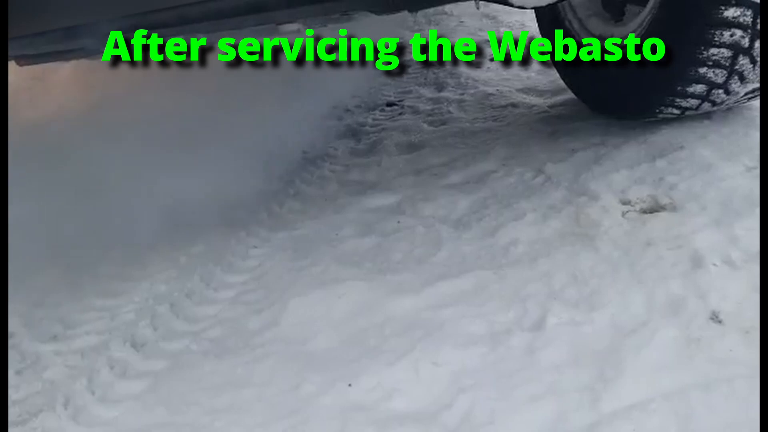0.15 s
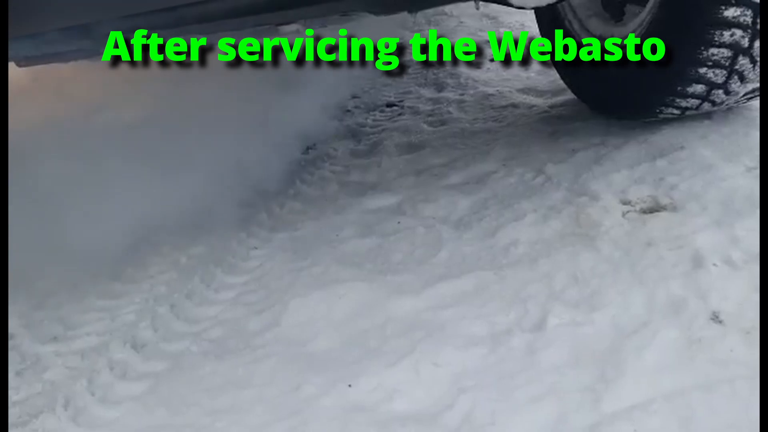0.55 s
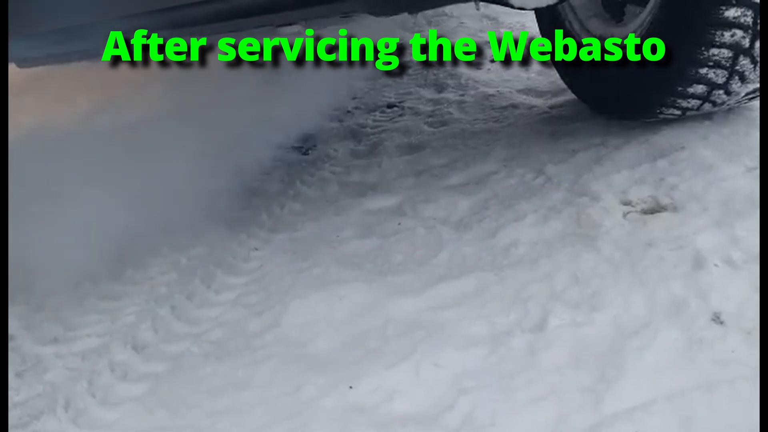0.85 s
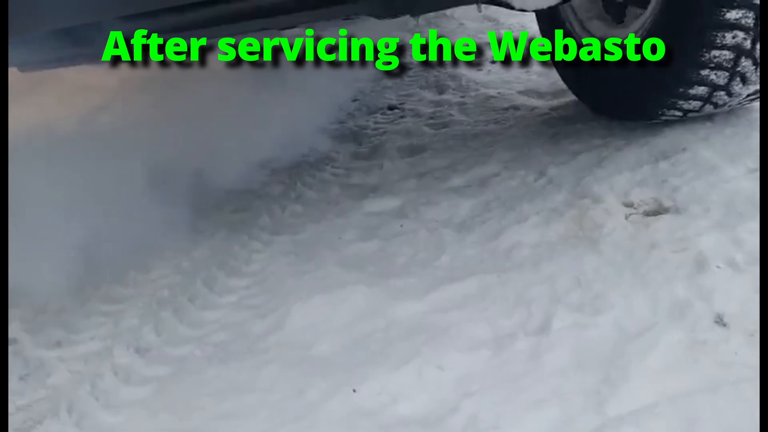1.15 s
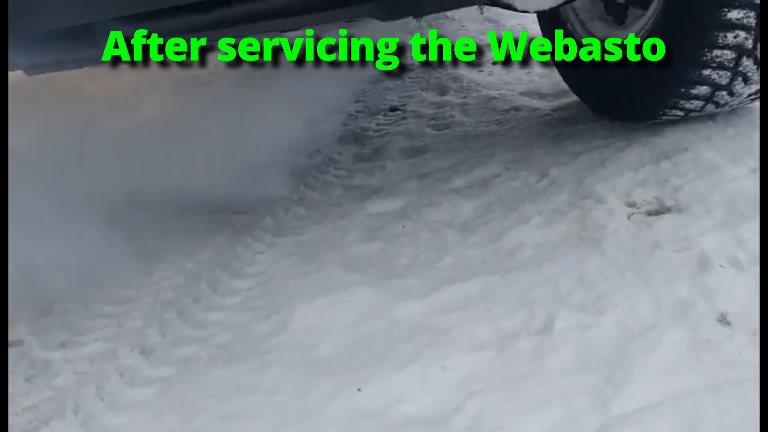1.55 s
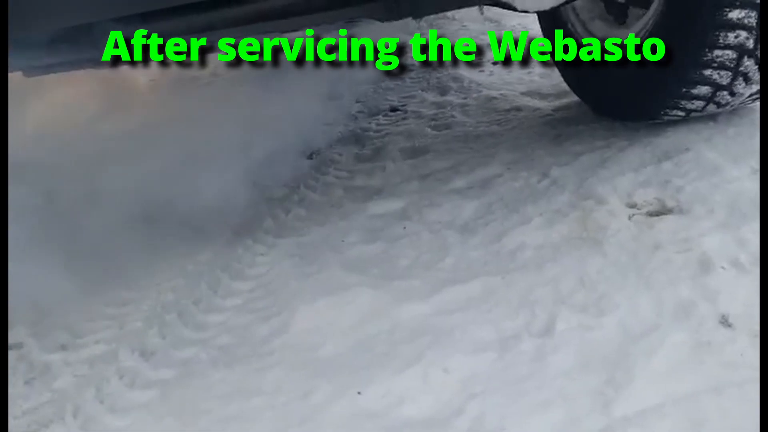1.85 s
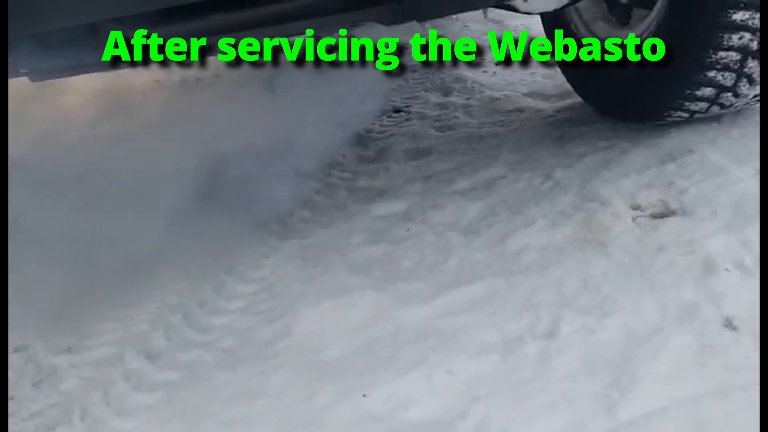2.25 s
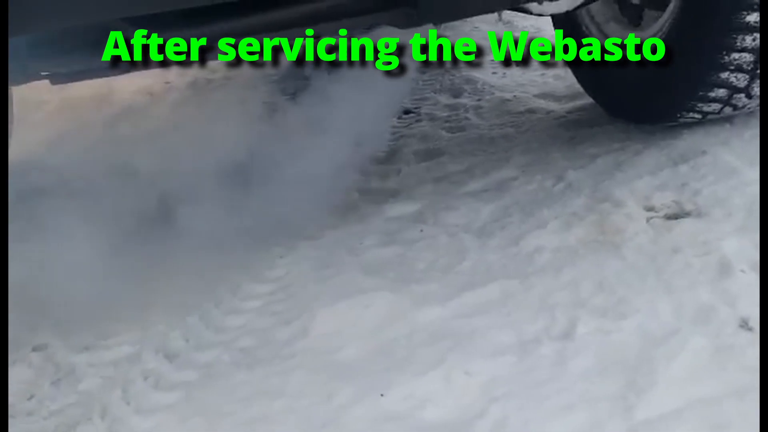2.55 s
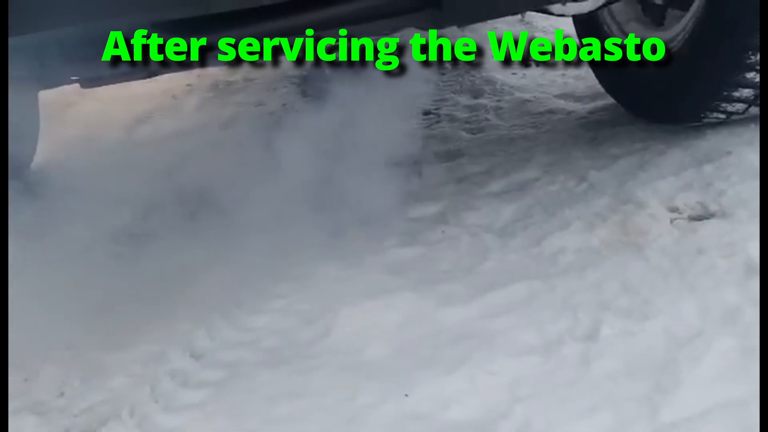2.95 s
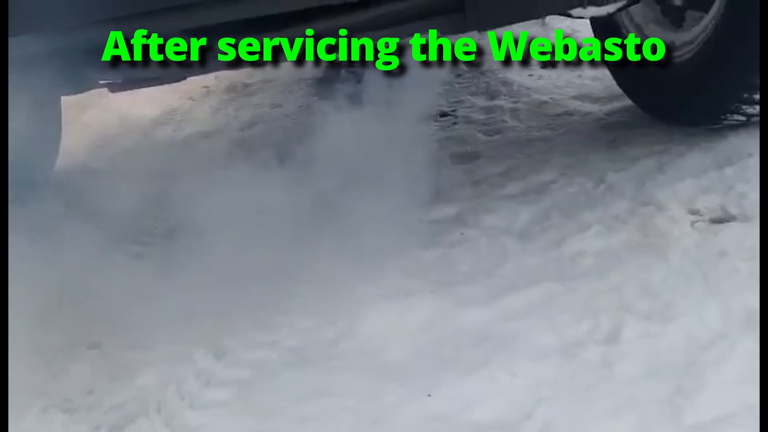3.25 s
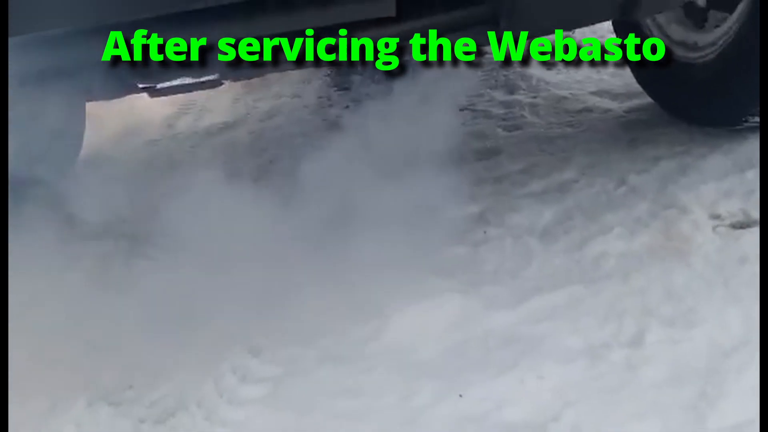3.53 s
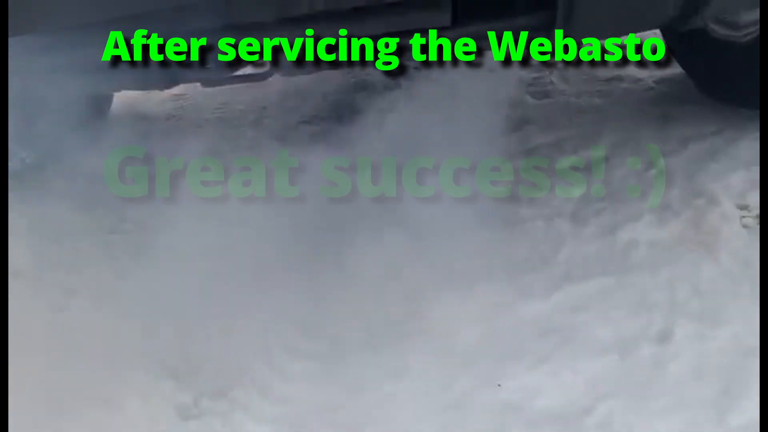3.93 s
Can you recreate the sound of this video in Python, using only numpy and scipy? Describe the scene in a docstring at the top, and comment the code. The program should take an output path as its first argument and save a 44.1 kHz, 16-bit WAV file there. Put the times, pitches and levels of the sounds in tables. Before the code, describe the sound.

Outdoor stereo close-up of a continuous mechanical drone: rapid exhaust pulses, uneven combustion knocks with a short metallic ring, a whirring blower and rough rushing gas. It is already running at the start and never stops. Late on, as the microphones shift, the ringing and exhaust sink while the roar and block knocks come forward.

```python
"""Outdoors on snow, close beside a parked vehicle, on two microphones a hand apart. From the start
a six-cylinder engine idles: firings ring two exhaust pipes, knocks ring the block and the burning gas.
A fuel heater's blower hums and ticks on its own speed, under the rush and rumble of flame and exhaust gas.
From about 2.5 s the microphones move along the vehicle: a hollow tone swells, treble echoes fade,
then gas ring and exhaust sink while the roar fills out, the block comes up and the hollow tones shift."""
import sys
import numpy as np
from scipy import signal
from scipy.fft import rfft, irfft
from scipy.io import wavfile
from scipy.ndimage import uniform_filter1d

SR = 44100
rng = np.random.default_rng(int(sys.argv[2]) if len(sys.argv) > 2 else 0)


def generate_wav(signal):
    """Clip the signal to [-1, 1] and save it as 16-bit WAV at the path in sys.argv[1]."""
    frames = np.transpose(np.atleast_2d(signal))
    scaled = np.clip(frames, -1, 1) * 32767
    pcm = np.round(scaled).astype(np.int16)
    wavfile.write(sys.argv[1], SR, pcm)


def gain_from_decibels(decibels):
    """Convert decibel values to linear amplitude factors."""
    exponent = np.asarray(decibels, float) / 20
    return 10 ** exponent


N = 180279


def rms_one(x):
    """Scales a signal to rms 1."""
    return x / np.sqrt(np.mean(x ** 2) + 1e-20)


def at_hz(points, hz):
    """Reads a curve of (frequency [Hz], value) points on a logarithmic frequency axis."""
    point_hz, value = np.transpose(points)
    return np.interp(np.log(hz), np.log(point_hz), value)


def ramp_db(start_s, db_per_s):
    """Level that stays at 0 dB until start_s, then moves at a steady rate."""
    return db_per_s * np.maximum(np.arange(N) / SR - start_s, 0)


def drift(rate_hz):
    """Slow random wander of spread 1: white noise through two equal low-pass poles."""
    step = 40   # computed at every 40th sample
    pole = np.exp(-2 * np.pi * rate_hz * step / SR)
    noise = rng.standard_normal(N // step + 4002)
    slow = signal.lfilter([1], [1, -2 * pole, pole * pole], noise)[4000:]
    return np.interp(np.arange(N) / step, np.arange(len(slow)), rms_one(slow - slow.mean()))


def ring(clicks, hz, t60):
    """A two-pole resonance: a unit click starts a sine of height 1 that falls 60 dB in t60 seconds."""
    pole, angle = gain_from_decibels(-60 / (t60 * SR)), 2 * np.pi * hz / SR
    feedback = [1, -2 * pole * np.cos(angle), pole * pole]
    return signal.lfilter([0, np.sin(angle)], feedback, clicks + 1e-18)


def swell(knocks, hz, t60):
    """A resonance driving an equal resonance swells and dies; unit height at the crest."""
    crest_gain = 2 * np.e * np.log(1000) / (t60 * SR)
    return ring(ring(knocks, hz, t60), hz, t60)[SR:] * crest_gain


# likeness of left and right in every noise: (frequency [Hz], correlation [0-1])
LEFT_RIGHT_LIKENESS = [(60, 1), (200, 0.13), (400, 1), (800, 0.56), (1500, 0.34), (3000, 0.35),
                       (6000, 0.06), (9000, 1), (13000, 0)]


def banded_noise(spectrum, patchy_db, moves=(0, 0, 1)):
    """Third-octave bands of stereo noise, each with its own level, flicker and likeness; rms 1.
    moves: one region changes level (start [s], rate against the other bands [dB/s], centre [Hz])."""
    start_s, db_per_s, centre_hz = moves
    out, together = 0, drift(22.0)
    edges = 28 * 2 ** np.arange(0, 9.1, 1 / 3)
    white = rng.standard_normal((2, 2, N))   # neighbouring bands take turns at two noises
    for k, (low, high) in enumerate(zip(edges, edges[1:])):
        hz = np.sqrt(low * high)
        if not spectrum[0][0] <= hz <= spectrum[-1][0]:
            continue
        band = signal.butter(2, [low, high], "band", fs=SR, output="sos")
        mid, side = signal.sosfilt(band, white[k % 2])
        alike = np.clip(at_hz(LEFT_RIGHT_LIKENESS, hz), 0, 1)
        swell_db = ramp_db(start_s, db_per_s) * np.exp(-2 * np.log2(hz / centre_hz) ** 2)
        flicker_db = patchy_db * (0.178 * together + drift(27.7))
        gain = gain_from_decibels(at_hz(spectrum, hz) + swell_db + flicker_db)
        out = out + gain * (np.sqrt(1 + alike) * mid + np.sqrt(1 - alike) * side * [[1], [-1]])
    return rms_one(out)


# slow wander of the idle: (time [s], speed before hunting [engine cycles/s])
IDLE_SPEED = [(0, 6.4387), (.6, 6.4529), (1.4, 6.4205), (2.4, 6.4384), (3.3, 6.418), (4.09, 6.4607)]


def engine_turns():
    """Engine cycles completed at every 20th sample, from a second before the start; the idle hunts."""
    s = np.arange(-SR, N, 20) / SR
    hunt_per_s, hunt_depth, hunt_crest_s = 1.53, 0.036, 0.408   # depth in cycles per second
    hunting = hunt_depth * np.cos(2 * np.pi * hunt_per_s * (s - hunt_crest_s))
    speed = np.interp(s, *np.transpose(IDLE_SPEED)) + hunting
    turns = np.cumsum(speed) * 20 / SR
    return turns - turns[SR // 20]


def each_cycle(places, levels_db, spread_db, jitter_s):
    """One click per place and engine cycle, starting early so that everything already rings."""
    turns = engine_turns()
    cycles = np.arange(-6, turns[-1] - 1e-9)[:, None]
    at = np.interp(cycles + places, turns, np.arange(0, N + SR, 20))
    at = at + jitter_s * SR * rng.standard_normal(at.shape)
    sizes = gain_from_decibels(levels_db + spread_db * rng.standard_normal(at.shape))
    inside = at < N + SR - 2
    return np.bincount(at[inside].astype(int), sizes[inside], N + SR)


# firings of each bank: (place in the engine cycle [0-1], relative strength [dB])
NEAR_FIRINGS = [(0.0518, 0.8), (0.3814, -1.5), (0.7224, -5)]
FAR_FIRINGS = [(0.0963, 0.31), (0.4283, 0.12), (0.7619, -1.25)]
# resonances of each bank's exhaust pipe:
# (frequency [Hz], relative level [dB], t60 [s], signed factor on the first swing [-])
NEAR_PIPE_MODES = [(58.5, -20.5, 0.199, -1.086), (66.6, -12, 0.0473, 0.943), (138.9, -12, 0.0437, 1),
                   (167.96, -0.9876, 0.0526, -0.968), (173.44, -4, 0.115, 0.883)]
FAR_PIPE_MODES = [(60.01, -8, 0.1299, -1.024), (62.3, -3, 0.05606, 0.9126), (105.24, -19, 0.1475, 0.989),
                  (202.03, -32.5, 0.262, 0.76), (220.72, -21, 0.1228, -0.864)]


def exhaust():
    """Every firing sends a pressure pulse down its bank's pipe, which rings at its resonances."""
    out = 0
    for firings, pipe in ((NEAR_FIRINGS, NEAR_PIPE_MODES), (FAR_FIRINGS, FAR_PIPE_MODES)):
        pulses = each_cycle(*np.transpose(firings), spread_db=0.6749, jitter_s=0.000157)
        for hz, db, t60, sign in pipe:
            out = out + sign * gain_from_decibels(db) * ring(pulses, hz, t60)
    # everything below about 40 Hz is cut steeply from the exhaust
    low_cut = signal.butter(4, 40, "high", fs=SR, output="sos")
    level_db = 3 + ramp_db(start_s=3.17, db_per_s=-1.7) + 0.61 * drift(16.3)
    return signal.sosfilt(low_cut, out)[SR:] * gain_from_decibels(level_db)


# combustion knocks: (place in the engine cycle [0-1], relative thud [dB], relative clatter [dB],
# relative gas ring [dB], gas ring before scatter [Hz])
COMBUSTION_KNOCKS = [(.112, -9.5, -11, -3, 1104), (.26, -3, -2, -11, 1070), (.425, -6.5, 2, -5, 1099),
                     (.59, -0.5, 1.5, -4.5, 1064), (.782, -1.5, -7.5, -4.5, 1094),
                     (.93, -2, 5.5, -12, 1122)]
# modes of the block: (frequency [Hz], relative level [dB], t60 [s])
BLOCK_RESONANCES = [(435.9, -28, 0.0438), (534, -29, 0.1063), (623, -39.5, 0.06), (701.4, -38.5, 0.073),
                    (774.4, -30.5, 0.0784), (824.7, -36.5, 0.092), (1448.6, -26.5, 0.0415)]
# clatter: (frequency [Hz], relative level per Hz [dB])
CLATTER_SPECTRUM = [(400, -20), (700, -12), (1500, 25), (2200, 22.5), (2800, -19), (4000, 22.5),
                    (6000, 3.5), (9000, -4.5), (14000, -12)]


def block():
    """Each knock strikes every mode with its own strength and moment; each side hears another face."""
    place, thud_db, clatter_db = np.transpose(COMBUSTION_KNOCKS)[:3]
    thuds = np.zeros((2, N))
    for hz, db, t60 in BLOCK_RESONANCES:
        both, left, right = (ring(each_cycle(place, thud_db + db, 1.0, 0.0003626), hz, t60)[SR:]
                             for _ in range(3))
        thuds += both + 0.456 * np.array([left, -right])
    clatter_clicks = each_cycle(place, clatter_db, spread_db=0.68, jitter_s=0.0016)
    clatter_t60_s = 0.034
    dying = signal.lfilter([1], [1, -gain_from_decibels(-60 / (clatter_t60_s * SR))], clatter_clicks)[SR:]
    soft = uniform_filter1d(dying, size=400)   # the clatter swells over nine milliseconds
    clatter = rms_one(soft * banded_noise(CLATTER_SPECTRUM, patchy_db=0.5))
    return thuds * gain_from_decibels(0.01 + ramp_db(start_s=3.44, db_per_s=1.07)) + gain_from_decibels(-48.5) * clatter


def gas_ring():
    """The burning gas rings at its own pitch in each cylinder, a little flat or sharp at each firing."""
    scatter, t60_s = 0.004, 0.0361   # scatter: share of pitch
    out, sharp = 0, rng.random(N + SR) < 0.5
    for place, _, _, db, hz in COMBUSTION_KNOCKS:
        early = 0.02133   # share of a cycle
        knocks = each_cycle([place - early], db - 22.5, spread_db=0.63, jitter_s=0.0004)
        out = out + swell(knocks * sharp, hz * (1 + scatter), t60_s)
        out = out + swell(knocks * ~sharp, hz * (1 - scatter), t60_s)
    return out * gain_from_decibels(ramp_db(start_s=3.114, db_per_s=-8))


# gain of the upper gas ring: (time [s], level [dB])
RASP_LEVEL = [(0, -33), (1.5, -31), (2.2, -29), (3.0, -26.5), (3.6, -29), (4.09, -32)]


def rasp():
    """The upper ring of the gas swells and dies at each knock, following the gas ring's strengths."""
    place, db = np.transpose(COMBUSTION_KNOCKS)[[0, 3]]
    early = 0.015253   # share of a cycle
    knocks = each_cycle(place - early, db, spread_db=1.58, jitter_s=0.0006)
    level_db = np.interp(np.arange(N) / SR, *np.transpose(RASP_LEVEL))
    return gain_from_decibels(level_db) * swell(knocks, hz=1675.2, t60=0.0296)


# blower tones: (multiple of the blower speed [-], rms level before side balance and waver [dB])
BLOWER_TONES = [(4, -40), (5, -44.5), (6, -52), (7, -39), (8, -44), (9, -43.5), (10, -52), (11, -40.5),
                (12, -49), (13, -48), (14, -51), (16, -48.5), (25, -50), (29, -47.5), (36, -53),
                (37, -42.5), (38, -50)]
# housing modes struck by the tick: (frequency [Hz], level before side balance [dB], t60 [s])
HOUSING_RESONANCES = [(1650, -36, .04), (2084, -43, .06), (2520, -38, .04), (2710, -38, .03),
                      (2810, -43, .03), (3240, -42, .025), (3770, -39, .025), (4075, -43, .035),
                      (4250, -43, .035), (4590, -39.5, .02), (4934, -43, .05), (5600, -43, .02),
                      (6320, -43, .025)]
# side balance of the blower: (frequency [Hz], left minus right [dB])
BLOWER_BALANCE = [(300, 4.5), (880, -4), (2000, 6), (2800, -10), (5000, 9), (6300, 1)]


def blower():
    """The heater's blower: wavering tones on multiples of its speed, and a housing tick every turn."""
    blower_hz = 23.95
    turns = np.cumsum(blower_hz * (1 + 0.0006 * drift(0.85))) / SR

    def sided(hz, db):
        """Gains of left and right."""
        return gain_from_decibels(db + at_hz(BLOWER_BALANCE, hz) / 2 * np.array([[1], [-1]]))

    out = 0
    for multiple, db in BLOWER_TONES:
        tone = np.sqrt(2) * np.sin(2 * np.pi * (multiple * turns + rng.random()))
        out = out + sided(multiple * blower_hz, db) * gain_from_decibels(0.66 * drift(2.35)) * tone
    ticks = np.diff(np.floor(turns), prepend=0) * gain_from_decibels(0.23 * rng.standard_normal(N))
    for hz, db, t60 in HOUSING_RESONANCES:
        out = out + sided(hz, db) * ring(ticks, hz, t60)
    return out


# rush: (frequency [Hz], relative level per Hz [dB])
RUSH_SPECTRUM = [(200, -10), (260, -6.5), (312, -12.5), (550, -7.5), (878, -13), (960, -9.5), (1090, -19.5),
                 (1300, -10.5), (1700, -13), (2310, -21), (4580, -22), (6500, -21.5), (14000, -34.5)]


def rush():
    """Flame and exhaust gas: broadband noise in uneven puffs, filling out around 590 Hz from 3.3 s."""
    puffs_db = 0.12 * drift(22)
    return gain_from_decibels(-29 + puffs_db) * banded_noise(RUSH_SPECTRUM, patchy_db=2.0, moves=(3.3, 1.87, 590))


# rumble: (frequency [Hz], relative level per Hz [dB])
RUMBLE_SPECTRUM = [(30, -18), (45, -31.5), (60, -11), (85, -4.5), (125, -1.5), (180, -10), (245, -14.5),
                   (330, -17.5), (500, -63)]


def rumble():
    """Flame roar in the burner: low, patchy noise."""
    return gain_from_decibels(-34.5) * banded_noise(RUMBLE_SPECTRUM, patchy_db=1.5)


# hollow tones: (centre frequency [Hz], rate of flutter [Hz], level until the change [dB],
# start of the change [s], rate of the change [dB/s])
HOLLOW_TONES = [(421.9, 11.1, -47.5, 2.545, 6.5), (511.4, 25, -52, 3.6, -4), (579, 22.6, -54.5, 3.35, 15.5)]


def hollow():
    """The roar rings in hollow spaces under the vehicle: fluttering tones that glide."""
    out = 0
    for hz, width_hz, db, start_s, db_per_s in HOLLOW_TONES:
        glide = 0.01179 * drift(3.3)   # share of pitch
        phase = 2 * np.pi * np.cumsum(hz * (1 + glide)) / SR
        flutter = drift(width_hz) * np.cos(phase) + drift(width_hz) * np.sin(phase)
        out = out + gain_from_decibels(db + ramp_db(start_s, db_per_s)) * flutter
    return out


# short echoes from the ground and the underbody, before they fade:
# (left delay [s], right delay [s], left share [-], right share [-])
GROUND_ECHOES = [(.002295, .0023, -.15, -.16), (.001192, .001087, -.14, .11),
                 (.001703, .001713, -.12, -.09)]


def echoed(x):
    """The treble arrives again a moment later and combs the sound; the echoes fade from 2.7 s."""
    high_pass = signal.butter(2, 1800, "high", fs=SR, output="sos")
    treble = signal.sosfiltfilt(high_pass, x)
    now = np.arange(N)
    echoes = np.zeros((2, N))
    for row in GROUND_ECHOES:
        for side in range(2):
            echoes[side] += row[2 + side] * np.interp(now - row[side] * SR, now, treble[side])
    return x + gain_from_decibels(ramp_db(start_s=2.7, db_per_s=-4)) * echoes


def scene():
    """Engine, heater and gas together; block, rasp, blower and rush also reach us by the echoes."""
    direct = exhaust() + gas_ring() + rumble() + hollow()
    return direct + echoed(block() + rasp() + blower() + rush())


def roll_off(x):
    """The treble ends steeply here."""
    return signal.sosfilt(signal.butter(12, 13750, fs=SR, output="sos"), x)


# overall colour of both sides, with a steep cut above 13 kHz: (frequency [Hz], level [dB])
OVERALL_COLOUR = [(12, -40.5), (26, 3), (38, 2), (55, -0.5), (1900, -0.5), (2200, -1.5), (2400, -0.5),
                  (2900, 4), (3400, 4.5), (3800, 1.5), (4150, 3.5), (5000, 0), (6300, -3), (7200, -6.5),
                  (8200, -19), (9200, -17.5), (10200, -13), (10900, -15.5), (12800, -2), (13150, -14.5),
                  (13300, -36.5), (14000, -60)]
# difference in colour: (frequency [Hz], left minus right [dB])
SIDE_COLOUR = [(60, -1), (91, -1), (140, -2.5), (210, -4.5), (320, -3.5), (490, -2), (740, -2.5),
               (1120, -8), (1700, -1.5), (2580, 1), (3920, -4.5), (5960, -9), (9050, 9.5), (13800, -14.5)]
# delay of right after left; the bass bends round the housing: (frequency [Hz], delay [s])
RIGHT_DELAY = [(800, .000245), (2100, .000496)]


def record(dry):
    """Overall colour dips sharply in the treble; the sides differ in colour, the right is reached later."""
    hz = np.arange(N // 2 + 1) * SR / N + 1
    side = np.array([[1], [-1]])
    colour_db = at_hz(OVERALL_COLOUR, hz) + side * at_hz(SIDE_COLOUR, hz) / 2
    lead = np.pi * hz * at_hz(RIGHT_DELAY, hz)   # half the delay on each side, as phase in radians
    heard = irfft(rfft(dry) * gain_from_decibels(colour_db) * np.exp(1j * side * lead), N)
    rounded = 0.8177 * np.tanh(heard / 0.83)   # the input stage rounds the tallest pulses
    return roll_off(rounded)


dry = scene()
out = record(dry)
generate_wav(out)
```